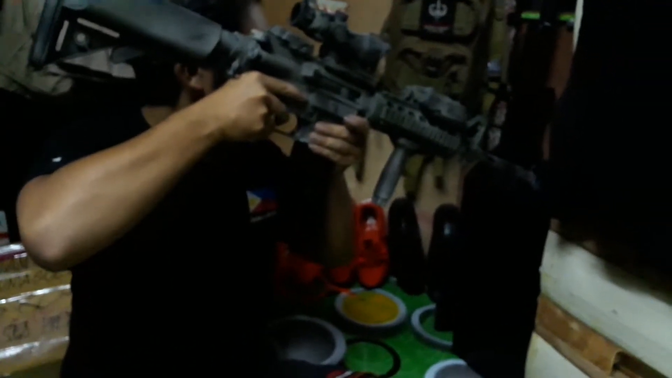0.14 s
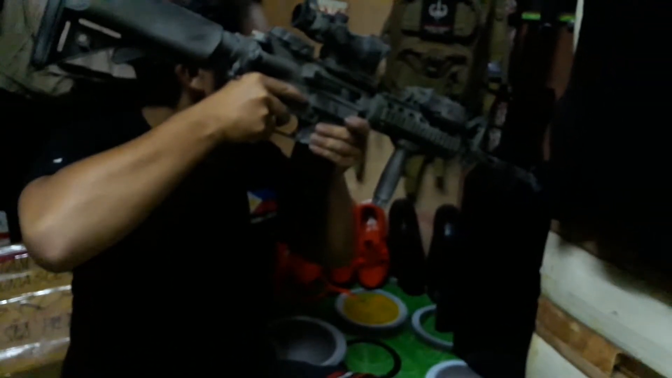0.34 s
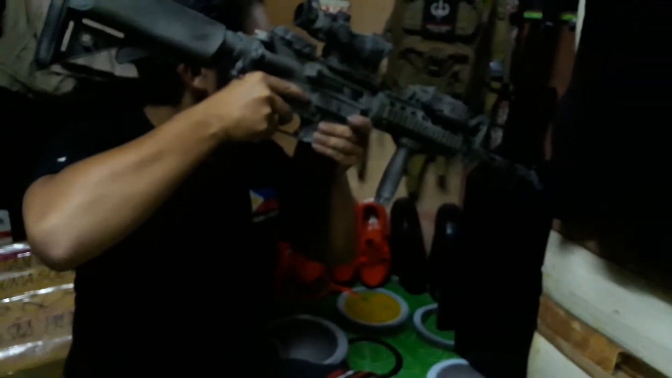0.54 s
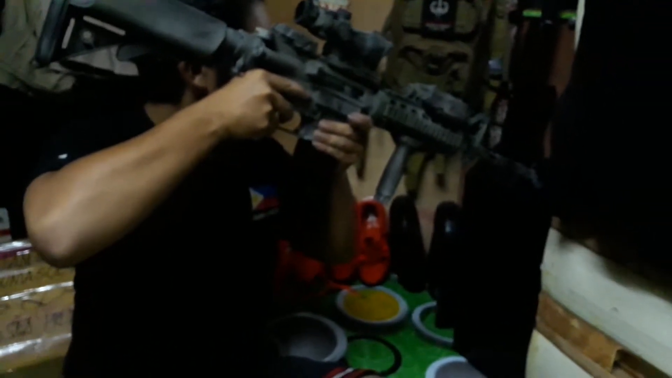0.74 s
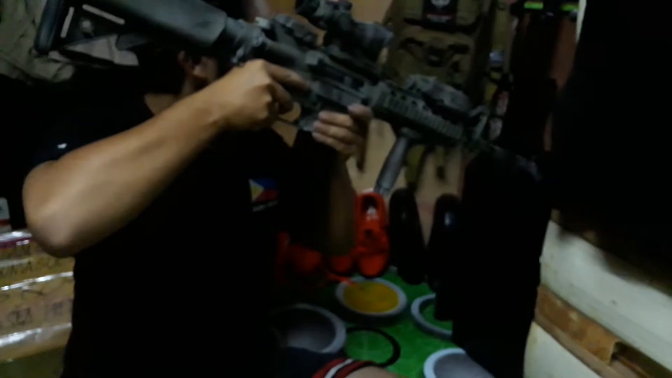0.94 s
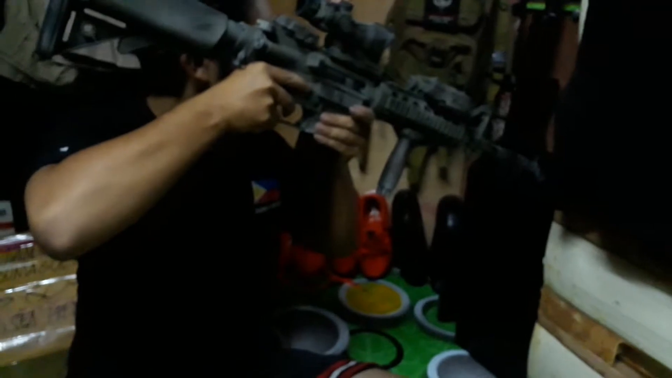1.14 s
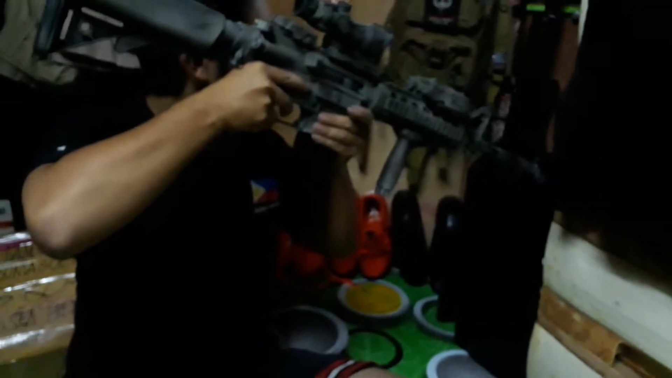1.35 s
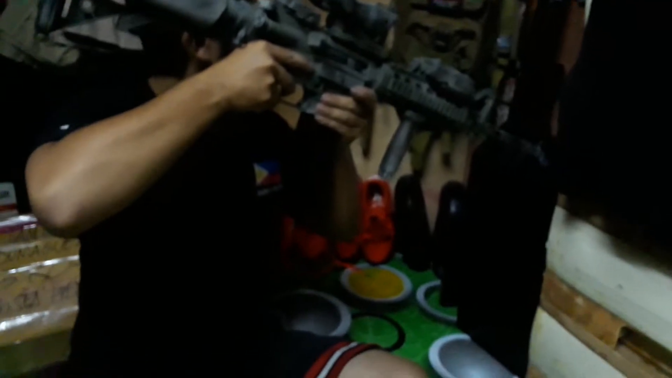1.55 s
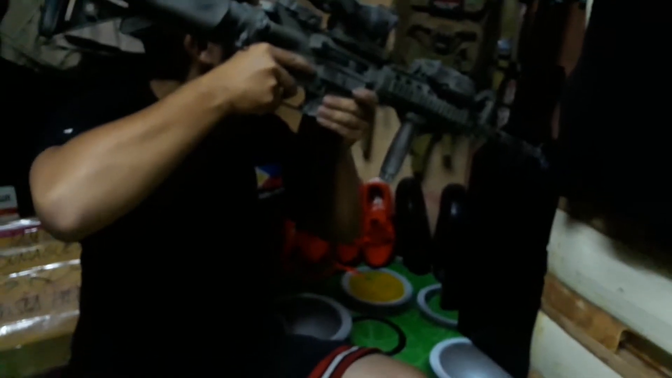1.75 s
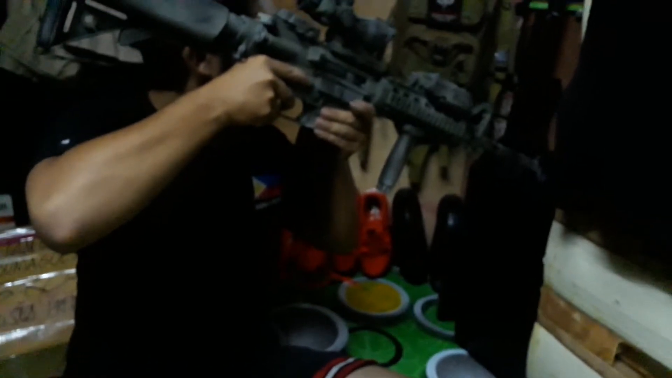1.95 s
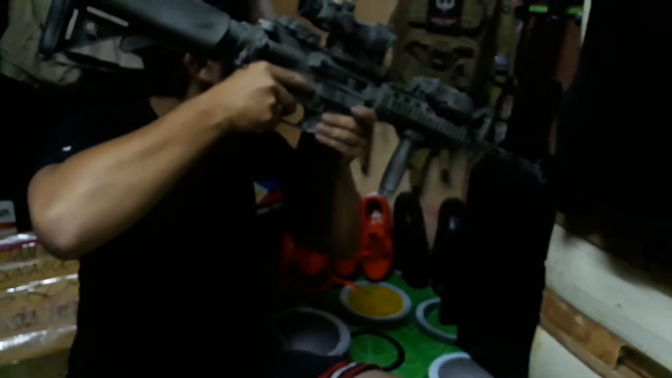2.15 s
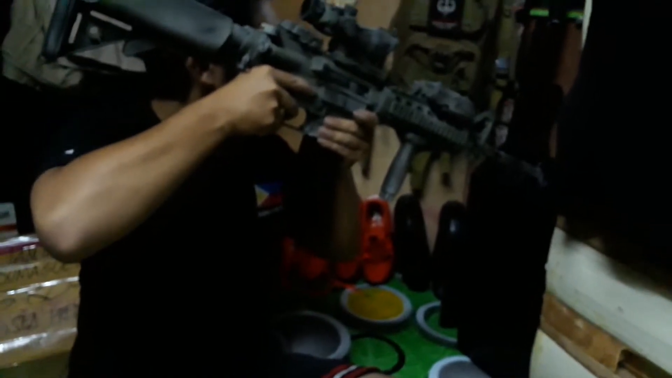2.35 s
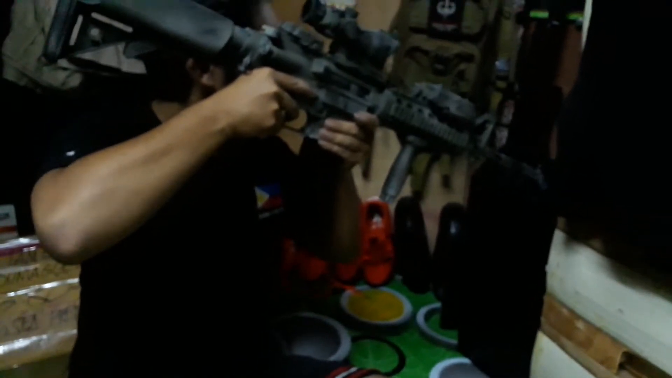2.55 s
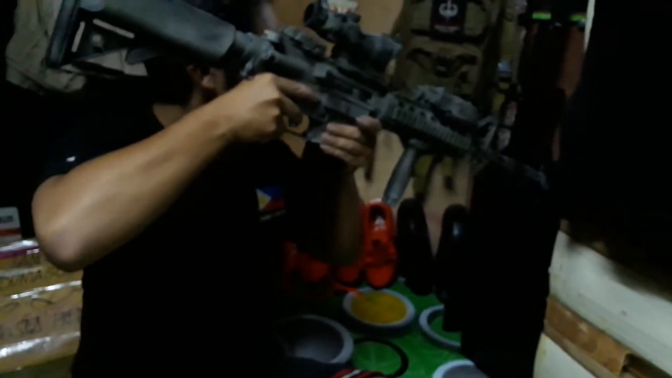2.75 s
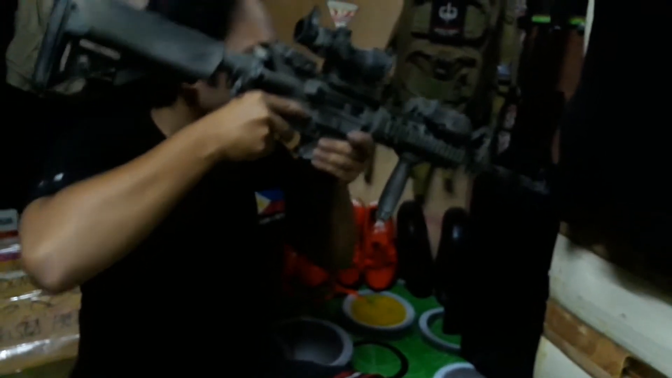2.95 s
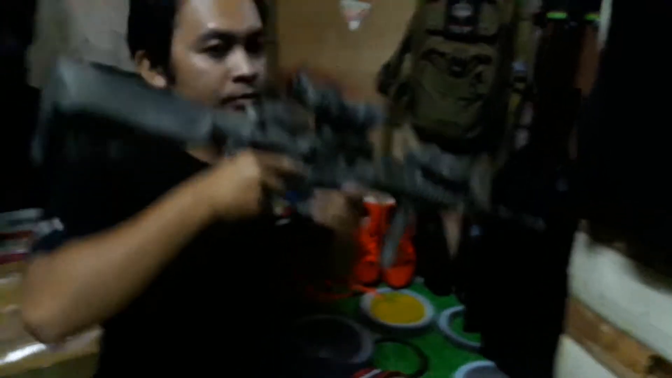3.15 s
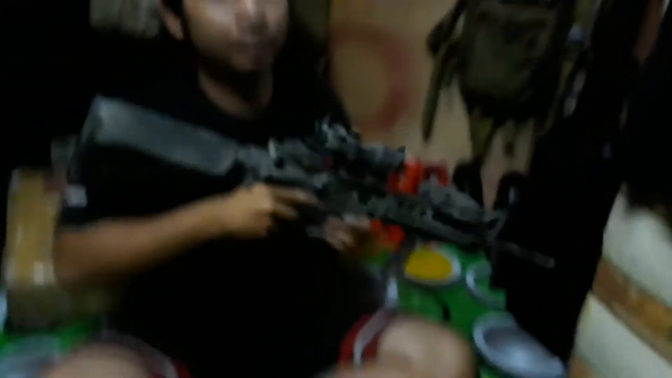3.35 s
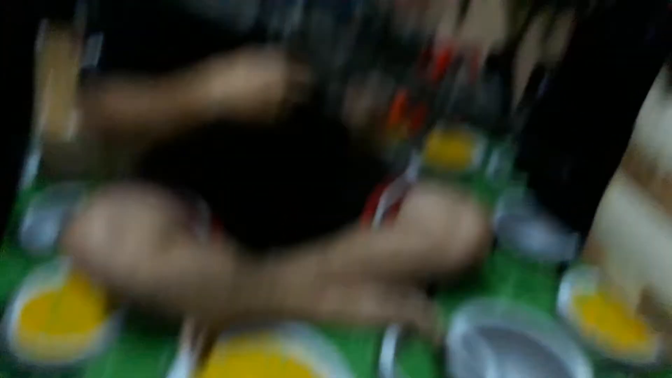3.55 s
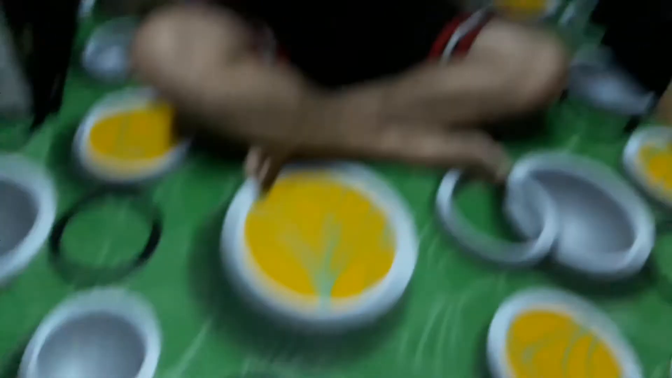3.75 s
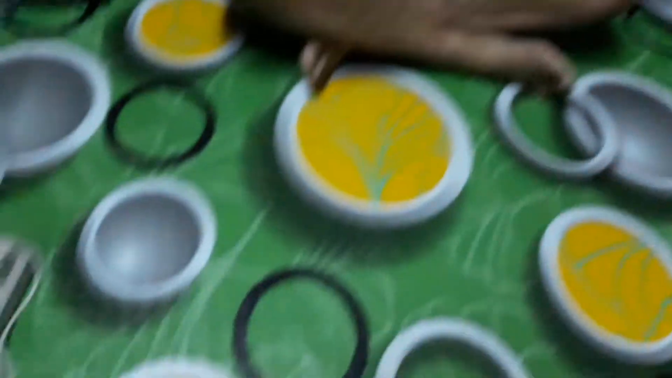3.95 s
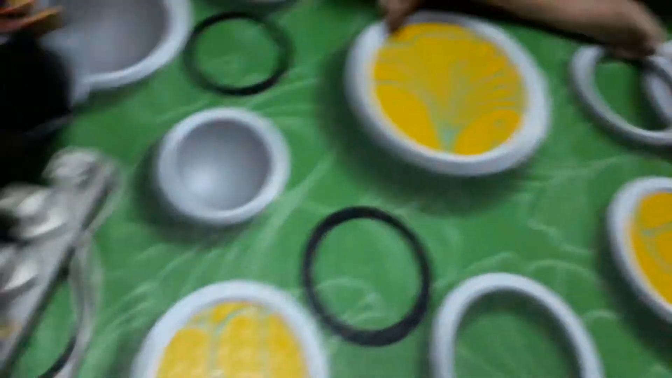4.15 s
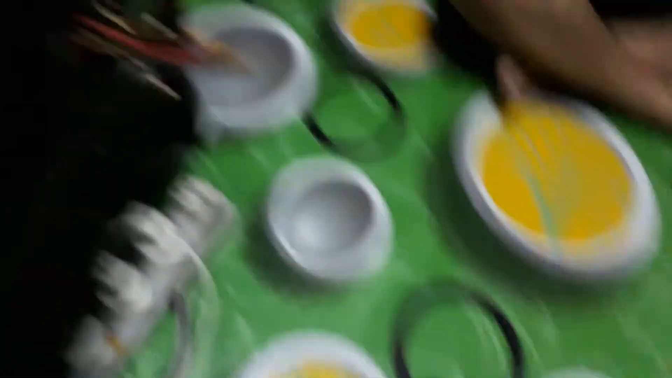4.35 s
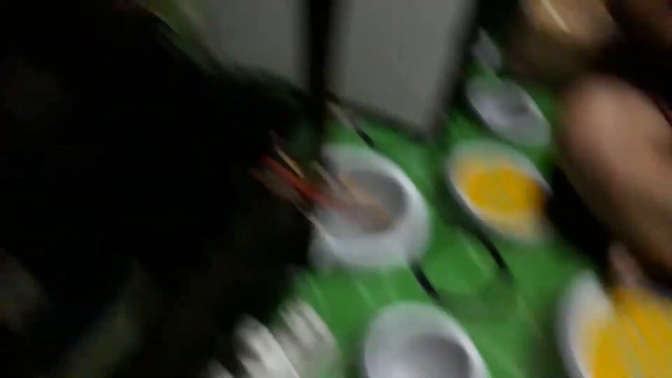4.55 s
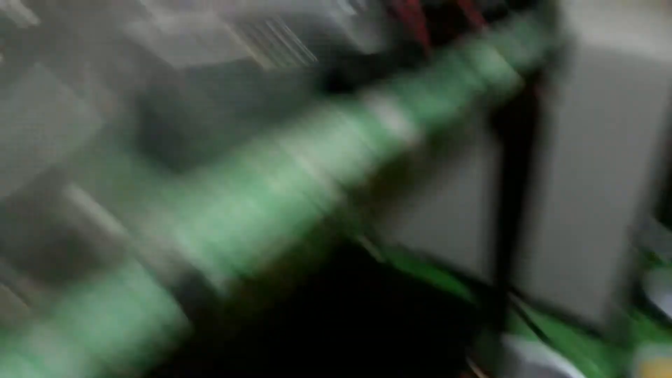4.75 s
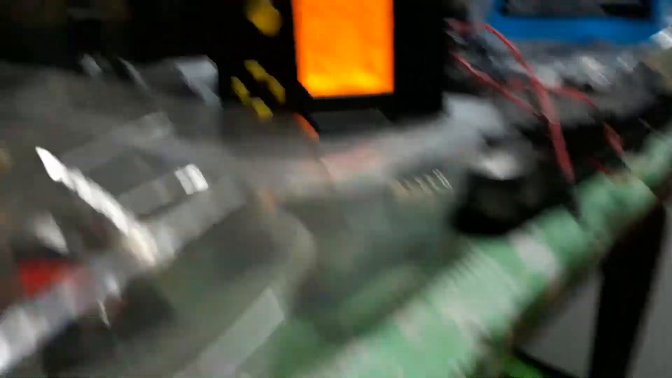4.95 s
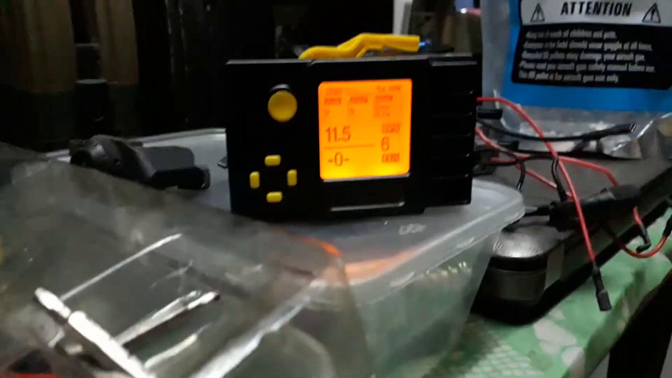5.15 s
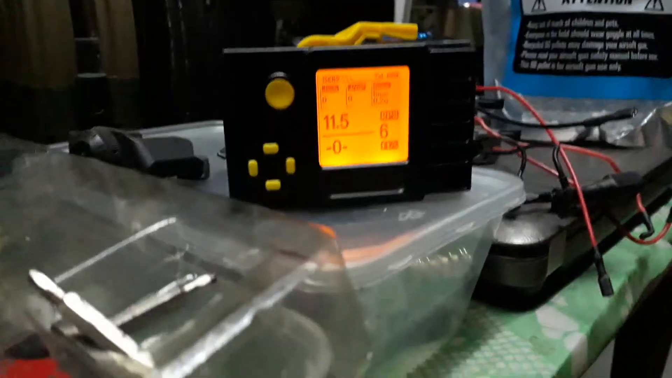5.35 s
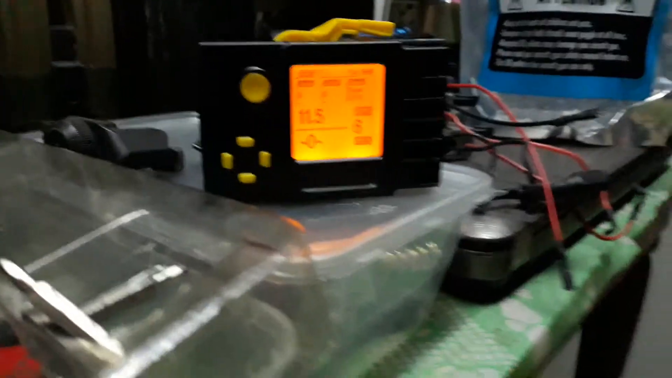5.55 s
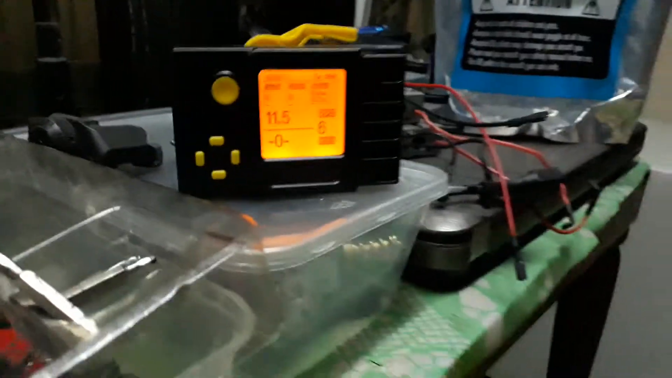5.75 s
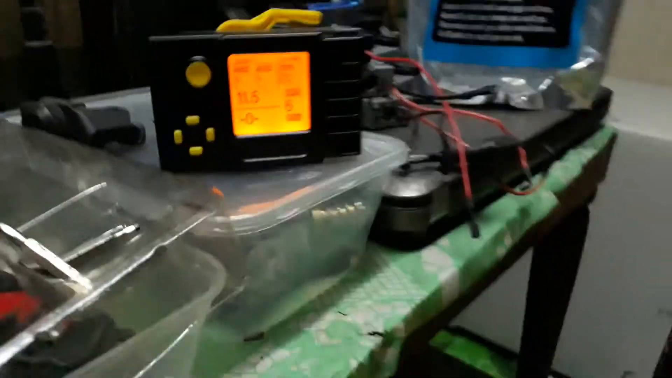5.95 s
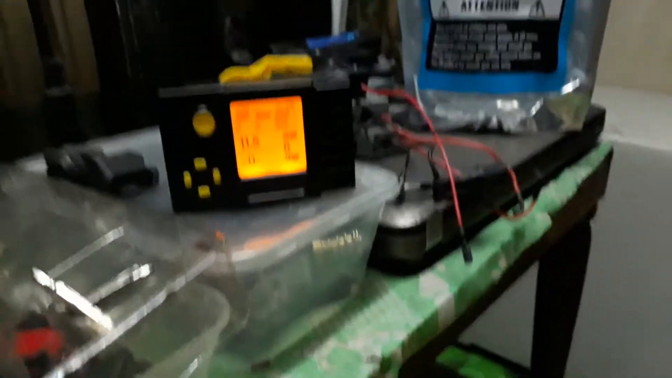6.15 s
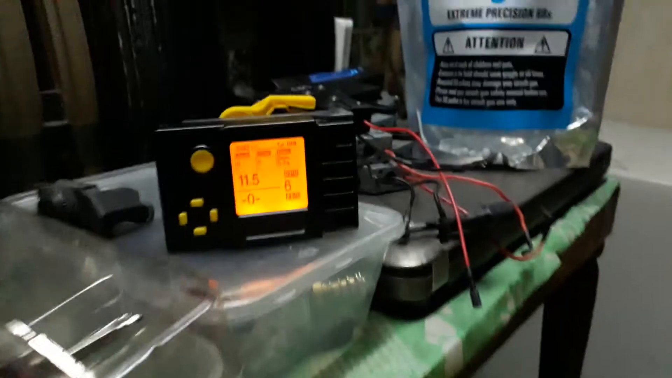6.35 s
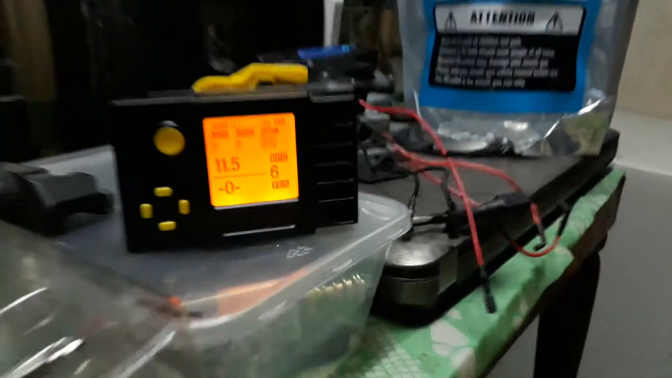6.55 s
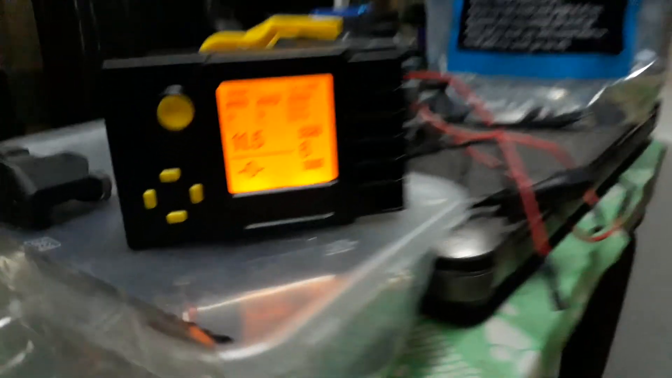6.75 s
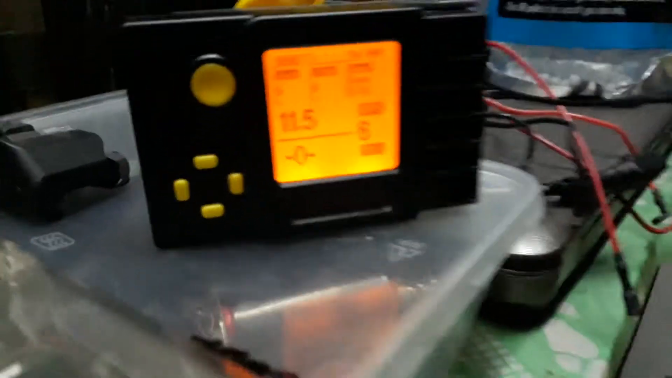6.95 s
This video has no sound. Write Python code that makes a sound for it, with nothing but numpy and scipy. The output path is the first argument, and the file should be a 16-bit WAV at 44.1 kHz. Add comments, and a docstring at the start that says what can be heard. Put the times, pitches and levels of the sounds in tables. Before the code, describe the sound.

From 0 s an electric airsoft rifle is already firing, very loud and close: grinding gear noise with ringing, whining midrange, and piston cracks with short thuds about eleven times a second. The motor brakes at 1.15 s with a quick falling whine and one clear tick. After a near-silent gap it spins up at 1.6 s and fires again until 2.7 s, then whines down. Short hard-room echoes vanish. From 2.8 to 3.6 s small parts tick over a faint thin metal ring. Around 4.0 to 4.25 s a tiny ratchet clicks, slowing. Rubbing and plastic creaks gather; hard, boomy microphone bumps hit at 4.5 s. Scuffs and snappy creaks stay busy until 5.9 s, then become sparser and softer to 7 s. Low room hush and a faint high insect, throbbing nearly eight times a second, rise back after 3.4 s.

```python
"""An electric airsoft rifle is already firing a long burst in a small room, and a second burst follows.
Dense tooth clicks grind through ringing bands; a piston slams about eleven times a second with cracks and thuds.
Afterwards dying sines make the rifle tick and a ratchet run down, while a hand shifts, rubs and bumps the camera:
filtered noise, creaks and sharp pulses. Outside, an insect throbs as a narrow noise band over a low room hush;
this background is held low under both bursts and swells back after the second."""
import sys
import numpy as np
from scipy import signal
from scipy.fft import rfft, irfft
from scipy.io import wavfile
from scipy.ndimage import uniform_filter1d

SR = 44100
rng = np.random.default_rng(int(sys.argv[2]) if len(sys.argv) > 2 else 0)


def invert_db(level):
    """Linear amplitude ratio for a level in decibels (20 dB per decade), elementwise."""
    return 10 ** (np.asarray(level, dtype=float) / 20)


def file_out(sig):
    """Save sig as 16-bit WAV at sys.argv[1]."""
    # one column per channel
    cols = np.atleast_2d(sig).T
    # limit, then scale
    lim = np.clip(cols, -1, 1)
    pcm = np.round(lim * 32767).astype(np.int16)
    wavfile.write(sys.argv[1], SR, pcm)


N = 308700  # samples, 7 s

# piston slams: start_s, level_db (of the air push and thud together)
SLAMS = [(0.0045, -11.5), (0.093, -12), (0.183, -7.5), (0.2715, -5.5), (0.3611, -8.5), (0.449, -8),
         (0.5377, -8.5), (0.6278, -12), (0.7178, -9), (0.8067, -8), (0.8958, -9), (0.9856, -10.5),
         (1.0745, -8.5), (1.6213, -5.5), (1.7224, -5.5), (1.8105, -9.5), (1.898, -9.5), (1.9858, -8),
         (2.0733, -7), (2.1611, -6), (2.2497, -4), (2.3385, -7.5), (2.426, -13), (2.5145, -6.5),
         (2.6021, -7.5), (2.7064, -4.5)]
# trigger pulls: pulled_s, released_s, gears_halt_s, dying_db_per_s (after the halt)
BURSTS = [(-.3, 1.145, 1.176, 1100), (1.58, 2.696, 2.818, 448.5)]


def evened(x):
    """Scales to rms 1."""
    return x / np.sqrt(np.mean(x ** 2) + 1e-20)


def read_curve(points, hz):
    """Reads a value at each pitch, joining the points on a log-frequency axis."""
    point_hz, value = np.transpose(points)
    return np.interp(np.log(hz + 1), np.log(point_hz + 1), value)


def coloured(x, spectrum):
    """Filters by a spectrum and scales to rms 1."""
    gain = invert_db(read_curve(spectrum, np.fft.rfftfreq(len(x), 1 / SR)))
    return evened(irfft(rfft(x) * gain, len(x)))


def resonate(x, hz, width):
    """Shifts the pitch hz (fixed or moving) down to zero, smooths, and shifts back."""
    turn = np.exp(2j * np.pi * np.cumsum(hz * np.ones(len(x))) / SR)
    r = np.exp(-np.pi * width / SR)
    return 2 * (turn * signal.lfilter([1 - r], [1, -r], x / turn)).real


def resonant_band(x, hz, width):
    """Passes a sound through the same resonance twice and scales to rms 1."""
    return evened(resonate(resonate(x, hz, width), hz, width))


def ring(modes, t, tilt_db=0, spread=0.058, scatter=1):
    """Dying sines, slightly detuned at each blow, their phases scattered by a share of a turn."""
    hz, db, t60 = np.transpose(modes)[:, :, None]
    detune, phase = rng.random((2, len(modes), 1))
    tones = np.sin(2 * np.pi * (hz * (1 + spread * (detune - .5)) * t + scatter * phase))
    level_db = db + tilt_db * np.log2(hz / hz.mean()) - 60 * t / t60
    return (invert_db(level_db) * tones).sum(0)


def add(mix, s, sound):
    """Mixes a sound in at time s."""
    part = mix[max(round(s * SR), 0):][:len(sound)]
    part += sound[:len(part)]


def grit(per_s, spread_db):
    """Dense random clicks, a few large, scaled to rms 1."""
    size = invert_db(spread_db * np.minimum(rng.exponential(1, N), 4))
    return evened(size * rng.standard_normal(N) * (rng.random(N) < per_s / SR))


def glide(length, from_hz, to_hz, phase):
    """A tone that swells, slides in pitch and fades."""
    u = np.arange(0, 1, 1 / (length * SR))
    turns = np.cumsum(from_hz + (to_hz - from_hz) * u) / SR + phase
    return np.sin(np.pi * u) * np.sin(2 * np.pi * turns)


def background_swell():
    """The level curve of the background in dB: low under the bursts, swelling back later."""
    # time_s, level_db (relative)
    swell = [(1.3, -15.5), (3.1, -14.5), (3.45, -7.5), (3.72, -1), (4.2, -1), (4.5, 3), (4.65, -0.5),
             (5.2, 2.5), (5.6, 0.5), (7.0, 0)]
    return np.interp(np.arange(N) / SR, *np.transpose(swell))


def background():
    """A low room hush, a thin high whine and a narrow insect band throbbing in level."""
    # hush spectrum: pitch_hz, level_db per Hz (relative)
    hush_colour = [(20, -39.5), (40, -13.5), (115, -3.5), (384, -10.5), (500, -14.5), (940, -19.5),
                   (2350, -29), (3500, -29), (5300, -34), (8500, -47.5), (11000, -39), (13000, -37),
                   (16000, -38)]
    insect_hz, insect_width_hz, throb_hz = 6200, 420, 7.8
    hush_db, whine_db, insect_db = -57.5, -87, -63.5  # before the swell and throb
    swell_db, t = background_swell(), np.arange(N) / SR
    hush = coloured(rng.standard_normal(N), hush_colour)
    whine = evened(resonate(rng.standard_normal(N), 14550, 60))
    insect = resonant_band(rng.standard_normal(N), insect_hz, insect_width_hz)
    throb = invert_db(4.4 * np.sin(2 * np.pi * throb_hz * (t - 6.4)))
    out = invert_db(hush_db + swell_db) * hush + invert_db(whine_db + swell_db) * whine
    return out + invert_db(insect_db + .75 * swell_db) * throb * insect  # the insect follows the swell less


def rubbing():
    """Skin on the camera shell: gritty noise from a resting grip, and strokes that press firmer and let go."""
    # strokes: start_s, firmest_s, end_s, treble_db, middle_db (against the treble)
    strokes = [(3.84, 3.88, 4.3, -77, 14), (4.014, 4.19, 4.3, -72, 14.5), (4.3, 4.33, 4.42, -63, 5),
               (4.349, 4.428, 4.47, -56, 10), (4.421, 4.545, 4.562, -48, 4.5), (4.54, 4.62, 4.8, -64, -4),
               (4.72, 4.96, 5.08, -54.5, -4.5), (5.022, 5.12, 5.22, -58, 4.5),
               (5.12, 5.245, 5.28, -55.5, 1.5), (5.3, 5.32, 5.37, -62, 10), (5.419, 5.435, 5.47, -64, 8),
               (5.589, 5.63, 5.67, -71, 11), (5.74, 5.8, 5.87, -70, 16), (5.852, 5.885, 6.093, -46, -1),
               (6.169, 6.25, 6.33, -67, -2), (6.329, 6.43, 6.49, -55, -2), (6.488, 6.53, 6.58, -61.5, -12),
               (6.58, 6.63, 6.7, -70.5, 1), (6.871, 6.93, 7.02, -65, 7.5)]
    # treble and middle spectra: pitch_hz, level_db per Hz (relative)
    treble_colour = [(2940, -20.5), (5000, -8), (5300, -18), (6130, -0.5), (9600, -1), (12000, -2),
                     (16000, -7.5)]
    middle_colour = [(290, -32), (500, 2), (807, 2), (1440, -3.5), (1710, -2.5), (1910, -3), (6000, -2.5),
                     (7800, -21.5), (13200, -120)]
    edge_db = -17.5  # fade at both ends of a stroke
    t, grip = np.arange(N) / SR, invert_db(1.1 * background_swell())  # the grip swells with the background
    high, mid = invert_db(-77) * grip, invert_db(-71) * grip
    for start, firmest, end, db, mid_db in strokes:
        u = np.interp(t, [start, firmest, end], [-1, 0, 1])
        press = invert_db(db + edge_db * u ** 2) * (abs(u) < 1)
        high, mid = np.hypot(high, press), np.hypot(mid, invert_db(mid_db) * press)
    skin = grit(8100, 1.8)
    return high * coloured(skin, treble_colour) + mid * coloured(skin, middle_colour)


def scuffs():
    """Scuffs within the rubbing: short noise bursts, each in one resonance, some as narrow as faint tones."""
    # start_s, length_s, pitch_hz, width_hz (of each filter pass), level_db (rms before the fades)
    scuff_rows = [(3.703, 0.068, 3000, 1500, -61.5), (3.856, 0.048, 1400, 600, -61),
                  (4.6678, .0035, 6000, 8900, -34.5), (4.92, 0.036, 1330, 300, -58),
                  (5.108, 0.067, 620, 90, -55.5), (5.215, 0.065, 6050, 1200, -54),
                  (5.47, .1, 710, 80, -61.5), (5.777, 0.1, 770, 80, -57), (6.288, 0.11, 1055, 119, -64),
                  (6.359, 0.076, 640, 79.6, -60.5), (6.825, 0.098, 1900, 250, -66.5),
                  (6.91, 0.047, 4000, 1200, -61.5)]
    out = np.zeros(N)
    for s, length, hz, width, db in scuff_rows:
        noise = rng.standard_normal(9000)[:round(length * SR)]
        fade = signal.windows.tukey(len(noise), .5)
        add(out, s, invert_db(db) * resonant_band(noise, hz, width) * fade)
    return out


def membrane_swing(t):
    """The microphone membrane swings at 105 Hz and quickly settles."""
    return np.cos(2 * np.pi * 105 * t) * np.exp(-t / .0028) * (1 - np.exp(-t / .0003))


def creaks():
    """The camera shell creaks: coloured noise snaps and fades, with a low membrane swing."""
    # start_s, creak_db, low_thump_db (both relative), treble_tilt_db (per octave)
    creak_rows = [(3.1074, -66, -56.5, 6), (3.22, -62.5, -54.5, 6.5), (3.2644, -56.5, -66, -6),
                  (3.325, -54, -58, -8), (3.41, -57, -57, -4), (3.8598, -48, -61.5, -4.5),
                  (4.279, -50, -50, -4), (4.313, -37, -50, 3.5), (4.324, -41.5, -50, -3.5),
                  (4.344, -39, -56, -1), (4.3885, -29, -68, -3), (4.443, -34, -43, -5),
                  (4.4695, -32.5, -43, -2.5), (4.7631, -36, -44, -2), (4.804, -34, -47, -4),
                  (4.868, -30, -38.5, -2), (4.8974, -32, -54, 3), (4.9345, -37, -55, -5.5),
                  (5.023, -31, -36.5, -0.5), (5.083, -32.5, -38, -3), (5.313, -32, -39.5, -4.5),
                  (5.4265, -37, -58, -4.5), (5.5592, -47, -59, -1), (5.600, -31.5, -56, -1),
                  (5.617, -38.5, -51, 2), (5.640, -35, -59, 1.5), (5.649, -40.5, -60, 2),
                  (5.657, -36.5, -60, 0), (5.703, -31.5, -41.5, -0.5), (5.719, -43, -58, -2),
                  (5.7437, -28.5, -59, 1.5), (5.7564, -35, -54.5, 3), (5.773, -33.5, -50.5, 1.5),
                  (5.796, -32, -46, 4.5), (5.8125, -36, -45.5, 1.5), (5.8413, -30.5, -48, 0.5),
                  (5.8581, -30.5, -49, 1), (6.2395, -44, -64, 4), (6.2765, -42, -69, 3.5),
                  (6.4421, -40.5, -55, 4.5), (6.630, -42, -46, 5), (6.6444, -41, -50, 5.5),
                  (6.725, -47, -55, -1), (6.7527, -47.5, -51, 3.5), (6.837, -33.5, -59, -3),
                  (6.875, -45, -50, 0), (6.9126, -39.5, -50, 0), (6.94, -41, -51, 0.5)]
    # shell spectrum: pitch_hz, level_db per Hz (relative)
    shell_colour = [(180, -32), (300, -5.5), (1810, -3), (3640, 0), (6100, -4.5), (7200, -3), (9710, -9),
                    (10700, -5), (16000, -23)]
    rise_s, snap_s, tail_share, tail_s = 0.0024, 0.0027, 0.11, 0.013
    out, t = np.zeros(N), np.arange(3000) / SR
    shape = (1 - np.exp(-t / rise_s)) * (np.exp(-t / snap_s) + tail_share * np.exp(-t / tail_s))
    for s, db, low_db, tilt_db in creak_rows:
        colour = [(hz, level + tilt_db * np.log2(hz / 4000)) for hz, level in shell_colour]
        creak = coloured(rng.standard_normal(len(t)), colour) * shape / shape.max()
        add(out, s, invert_db(db - 10.0) * creak + invert_db(low_db + 7.5) * membrane_swing(t))
    return out


def bumps():
    """Bumps dent the microphone membrane, rebound ever closer and weaker, crackle and leave it swinging."""
    # start_s, peak_db, width_s, first_rebound_s (after the bump), swing_db
    bump_rows = [(4.444, -24, .0006, .004, -24), (4.5221, -8, .00015, .0013, -11),
                 (4.5335, -16, .0001, .0002, -24), (4.5377, -24, .00008, .0002, -36),
                 (4.5548, 1, .00014, .0006, -2)]
    shrink, rebound_db = .55, -1.6  # each gap against the last; loss grows with the square of the count
    crackle_s, crackle_db, crackle_growth = .002, -17, 2.5  # a hard bump crackles far more
    out, t = np.zeros(N), np.arange(3000) / SR
    for s, db, width, gap, swing_db in bump_rows:
        delays = gap * (1 - shrink ** np.arange(4)) / (1 - shrink)
        for k, late in enumerate(delays):
            dent = -np.exp(-(abs(t - 4 * width) / (width * shrink ** (k / 2))) ** 1.4)
            add(out, s + late - 4 * width, invert_db(db + rebound_db * k ** 2) * dent)
        add(out, s + delays[-1] - gap / 2, invert_db(swing_db) * membrane_swing(t))
        # cubed noise is spiky; it begins before the bump and ends after it
        crackle = uniform_filter1d(rng.standard_normal(len(t)) ** 3, size=2) * (t < 2 * crackle_s)
        add(out, s - crackle_s, invert_db(crackle_db + crackle_growth * db) * crackle / 4)
    return out


def clicks(rows, modes, rattle_s, rise_s):
    """Small parts: a click followed by a brief rattle rings the modes."""
    out, t = np.zeros(N), np.arange(2500) / SR
    for s, db, tilt_db in rows:
        blow = (t == 0) + 0.13 * rng.standard_normal(len(t)) * np.exp(-t / rattle_s)
        body = ring(modes, t, tilt_db, spread=0.033, scatter=0.054) * (1 - np.exp(-(t / rise_s) ** 2))
        sound = signal.oaconvolve(blow, body)[:len(t)]
        add(out, s, invert_db(db) * sound / abs(sound).max())
    return out


def ratchet():
    """A ratchet runs down: a pawl rings very briefly at each click, the clicks slowing towards the end."""
    # start_s, peak_db, treble_tilt_db (per octave)
    click_rows = [(3.9674, -26, 1), (3.9846, -38, 0), (4.001, -38, 0), (4.016, -40, 0), (4.0306, -41, 0),
                  (4.0459, -40, 0), (4.0634, -39, 0), (4.0833, -39, 0), (4.1068, -36.5, 0),
                  (4.1342, -37, 0), (4.1761, -35.5, 0), (4.2435, -32, 0)]
    # ringing of the pawl: pitch_hz, level_db (relative), time_to_fall_60_db_s
    pawl_modes = [(3800, -8, .003), (4200, -8, .003), (4650, -6, .003), (5200, -1, .0035), (5800, -4, .003),
                  (6500, -7, .003)]
    return clicks(click_rows, pawl_modes, rattle_s=.0015, rise_s=0.0006)


def loose_parts():
    """Small plastic and metal parts of the rifle tick, each ringing for a few thousandths of a second."""
    # start_s, peak_db, treble_tilt_db (per octave)
    tick_rows = [(1.2069, -12, 0), (1.4845, -54, -1.5), (1.4969, -54, 0), (2.8094, -27, -8),
                 (2.9035, -47, 4), (2.8714, -41.5, 6), (2.8855, -44, 6), (2.9242, -50, 2.5),
                 (2.9587, -47, 5), (2.9947, -47, 6), (3.4441, -48, -7), (3.5054, -35.5, 3), (3.516, -41, 4),
                 (3.5673, -45, 0)]
    # ringing of a part: pitch_hz, level_db (relative), time_to_fall_60_db_s
    part_modes = [(2700, -6, .006), (3350, -1, .007), (3800, -3, .006), (4900, -4, .006), (5600, -4, .006),
                  (6400, -3, .006), (7300, -7, .005)]
    return clicks(tick_rows, part_modes, rattle_s=0.0049, rise_s=0.00022)


def after_ring():
    """One thin metal tone left by the second burst, slowly dying."""
    # start_s, pitch_hz, level_db, time_to_fall_60_db_s
    s, hz, db, t60 = (2.85, 3600, -69, 1.3)
    t = np.arange(N) / SR - s
    return invert_db(db - 60 * abs(t) / t60) * (t > 0) * np.sin(2 * np.pi * hz * t)


def braking():
    """The mesh tone dives as the motor brakes at each burst's end, roughened by random flutter."""
    # start_s, length_s, from_hz, to_hz, level_db (before roughening)
    dives = [(1.138, .032, 3350, 1750, -24), (2.665, .032, 3500, 2000, -25)]
    out = np.zeros(N)
    for s, length, from_hz, to_hz, db in dives:
        add(out, s, invert_db(db) * glide(length, from_hz, to_hz, rng.random()))
    flutter = evened(uniform_filter1d(rng.standard_normal(N), size=60))
    return out * (1 + .6 * flutter)


def motor():
    """Level and speed: a quick spin-up, a coast after the trigger is let go, then the gears halt."""
    full_db, spin_up_db, spin_up_s, coast_db_per_s = -14.5, 62.5, 0.0067, 180
    start_speed, speed_up_s, halt_speed = 0.49, .015, .78  # speeds as shares of full speed
    t, gain, speed = np.arange(N) / SR, np.full(N, 1e-6), np.ones(N)
    for pulled, released, halt, dying_db in BURSTS:
        on, coast = (t - pulled).clip(0), (t - released).clip(0, halt - released)
        db = full_db - spin_up_db * np.exp(-on / spin_up_s)
        db = db - coast_db_per_s * coast - dying_db * (t - halt).clip(0)
        gain = gain + invert_db(db) * (t > pulled)
        now = 1 - (1 - start_speed) * np.exp(-on / speed_up_s)
        now = now - (1 - halt_speed) * coast / (halt - released)
        speed = np.where(t > pulled, now, speed)
    return 20 * np.log10(gain), speed


def time_since_slam():
    """Seconds since the last slam; before the second burst's first slam, its place in a firing cycle."""
    cycle_s = .088
    t, slam_s = np.arange(N) / SR, np.array([row[0] for row in SLAMS])
    since = (t - slam_s[np.maximum(np.searchsorted(slam_s, t) - 1, 0)]).clip(0)
    second_pull = BURSTS[1][0]
    winding_up = (t > second_pull) & (since > 2 * cycle_s) & (t < slam_s[-1])
    next_slam = slam_s[np.searchsorted(slam_s, second_pull)]
    return np.where(winding_up, (t - next_slam + cycle_s).clip(0), since)


def singing_mesh():
    """Mesh tones sing out and fall as the spring loads the motor, with a random level each time."""
    # after_slam_s, length_s, from_hz, to_hz, level_db (relative, middle of its random range)
    tones = [(.038, .03, 5450, 4980, -5), (.026, .024, 3450, 3250, -5), (.04, .024, 3850, 3750, -7),
             (.06, .028, 3800, 3420, -9), (.062, .022, 4750, 4400, -12)]
    out = np.zeros(N)
    for late, length, from_hz, to_hz, db in tones:
        for (s, _), (phase, luck) in zip(SLAMS, rng.random((len(SLAMS), 2))):
            add(out, s + late, invert_db(db - 5 * (luck - .5)) * glide(length, from_hz, to_hz, phase))
    return out


def gearbox():
    """Tooth impacts ring the casing; the same teeth meet in every cycle, so much of the noise repeats."""
    # load through one firing cycle: after_slam_s, casing_db, treble_hiss_db, mesh_whine_db (all relative)
    load = [(0, -14, -0.5, -1.5), (.012, -0.5, -5.5, -11.5), (0.023, -2, 0.5, -7.5), (0.028, -2, 0.5, -4.5),
            (0.049, -2, 1, -4.5), (.075, -3.5, 1, -4.5), (0.085, 4.5, -4, 3), (0.122, -0.5, -4.5, 8)]
    # casing resonances: pitch_hz, width_hz (before widening), level_db (relative)
    casing_modes = [(1970, 110, -9.5), (3443, 280, 4), (3710, 390, -0.5), (4216, 150, 1.5), (5470, 660, -1),
                    (5770, 340, -4.5), (6420, 350, 2.5), (6800, 260, -5.5), (6670, 62, -18.5),
                    (3000, 160, -18)]
    # hiss spectrum: pitch_hz, level_db per Hz (relative)
    hiss_colour = [(35, -55.5), (60, -29), (323, -25), (1470, -17), (2140, -7), (2350, -11), (2900, -11),
                   (3760, 0.5), (4530, -6), (5330, -3), (8320, -23), (11500, -14.5), (16000, -26.5)]
    # whine at full speed: pitch_hz, width_hz (of each filter pass), level_db (relative)
    whine_modes = [(1268, 18, -43), (1670, 32, -44), (2188, 62, -27)]
    rack_hz = 96  # teeth of the piston rack caught each second
    level_db, speed = motor()
    since = time_since_slam()
    s, *columns = np.transpose(load)
    casing_db, hiss_db, mesh_db = (np.interp(since, s, c) for c in columns)
    rack = np.cos(2 * np.pi * rack_hz * (since - .028)) * (since > .023)  # each rack tooth swells the noise
    teeth = grit(10000, 2.2)
    repeated = teeth[(since * SR).astype(int)]
    teeth = (.75 * teeth + .65 * repeated) * invert_db(1.1 * rack)
    casing = evened(sum(invert_db(db) * resonant_band(teeth, hz, 1.5 * w) for hz, w, db in casing_modes))
    hiss = coloured(grit(12000, 1.2), hiss_colour)
    grinding = invert_db(casing_db - 4.5) * casing + invert_db(hiss_db - 4.0) * hiss + singing_mesh()
    whine = sum(invert_db(db) * resonant_band(teeth, hz * speed, w) for hz, w, db in whine_modes)
    whine_db = 1.8 * (level_db - level_db.max()) + mesh_db + 2.0 * rack
    return invert_db(level_db) * grinding + invert_db(whine_db) * whine


def piston():
    """Each slam: a crack, air pushed, reversed and returned at the muzzle, a ringing cylinder and a body thud."""
    # crack spectrum: pitch_hz, level_db per Hz (relative)
    crack_colour = [(470, -28.5), (800, -6.5), (1500, -3.5), (2290, -6), (3420, -3.5), (4740, -6.5),
                    (5310, 0), (6910, -1.5), (7830, -7.5), (10200, -11), (11100, -6.5), (16000, -21)]
    # metal rung by the piston: pitch_hz, level_db (relative), time_to_fall_60_db_s
    cylinder_modes = [(5200, -1, .09), (5750, -4, .07), (6210, -1, .09), (6600, -1, .09), (6850, -1, .09),
                      (7150, -2, .09)]
    # stock and body: pitch_hz, level_db (relative), time_to_fall_60_db_s
    thud_modes = [(85, -19, 0.046), (136, -14.5, 0.045), (244, -18.5, 0.069), (428, -25, 0.092),
                  (840, -13, 0.049)]
    # floor and walls: delay_s, level_db
    echo_rows = [(.0032, -13), (.0058, -21.5), (.0075, -15.5), (0.012, -30.5), (0.019, -30)]
    lead_s, reverse_s, return_s = .001, 0.002, .0028  # the body moves before the crack; delays of later pushes
    out, t = np.zeros(N), np.arange(8000) / SR
    u = t - lead_s
    for (s, push_db), (a, b) in zip(SLAMS, rng.random((len(SLAMS), 2)) - .5):
        push = (.7 + 0.5 * a) * np.exp(-((u - .0003) / 0.0004) ** 2)
        push = push - np.exp(-((u - reverse_s) / 0.00036) ** 2)
        push = push + 0.83 * np.exp(-((u - return_s) / 0.00032) ** 2)
        thud = invert_db(0.9 + 5 * b) * ring(thud_modes, t, spread=0.11, scatter=0.5) * (1 - np.exp(-t / 0.0012))
        fade = (1 - np.exp(-t / 0.00023)) * (np.exp(-t / 0.014) + 0.05 * np.exp(-t / 0.033))
        crack = coloured(rng.standard_normal(len(t)), crack_colour) * fade
        add(out, s - lead_s, invert_db(push_db) * (push + thud))
        add(out, s, invert_db(-10) * crack + invert_db(-18.5) * ring(cylinder_modes, t, spread=0.0092))
    echoes = np.zeros(1500)
    for s, db in echo_rows:
        echoes[round(s * SR)] = -invert_db(db)
    return out + signal.oaconvolve(out, echoes)[:N]


def room(x):
    """Sparse echoes of random sign, each band dying at its own speed."""
    # pitch_hz, time_to_fall_60_db_s
    decay = [(100, 0.09), (500, 0.18), (2000, 0.17), (6000, 0.2), (15000, 0.16)]
    late_db, late_stretch = -22, 2.6  # a fainter, slower tail from the rooms beyond
    taps = np.zeros(SR // 2)
    at = np.arange(300, len(taps) - 20, 20)
    taps[at + rng.integers(0, 20, len(at))] = rng.choice([-1., 1.], len(at))
    hz, t, z = signal.stft(taps, SR, nperseg=256)
    fall_db = -60 * t / read_curve(decay, hz)[:, None]
    fall = invert_db(fall_db) + invert_db(late_db + fall_db / late_stretch)
    tail = signal.istft(z * fall, SR, nperseg=256)[1]
    return signal.oaconvolve(x, tail / np.linalg.norm(tail))[:N]


def scene():
    """The rifle in the room, the hand at the camera, the background."""
    rifle = gearbox() + piston() + loose_parts() + ratchet() + braking() + after_ring()
    hand = rubbing() + scuffs() + creaks() + bumps()
    return (rifle + invert_db(-17.5) * room(rifle) + hand + background())[None]


def roll_off(x):
    """The treble ends steeply here."""
    return signal.sosfilt(signal.butter(12, 16890, fs=SR, output="sos"), x)


def record(dry):
    """A small microphone with a bass cut below 58 Hz and soft overload."""
    cut = signal.sosfilt(signal.butter(3, 58, "high", fs=SR, output="sos"), dry)
    mix = 1.113 * np.tanh(cut / 1.095)
    return roll_off(mix)


dry = scene()
out = record(dry)
file_out(out)
```